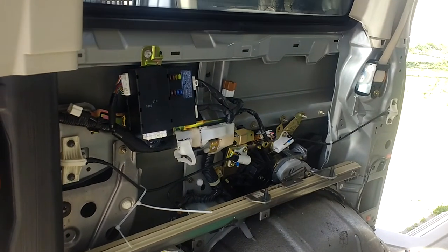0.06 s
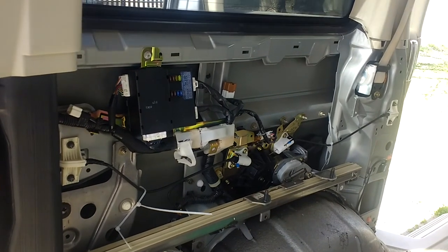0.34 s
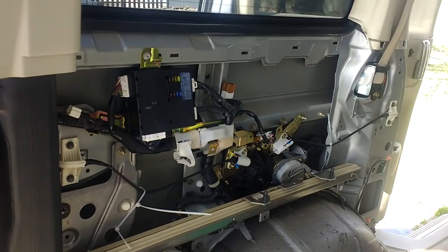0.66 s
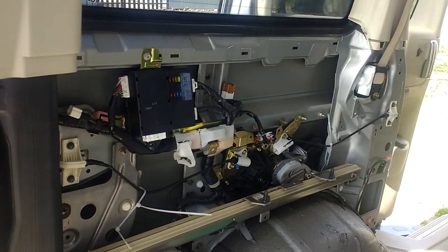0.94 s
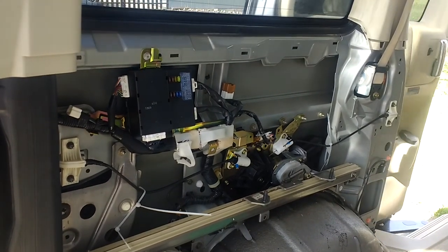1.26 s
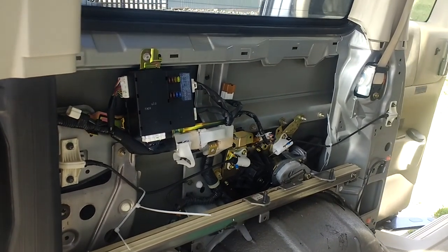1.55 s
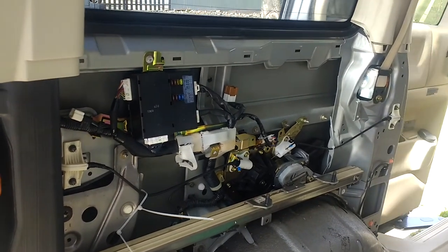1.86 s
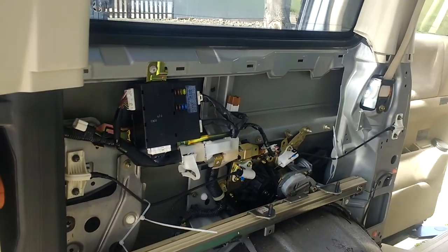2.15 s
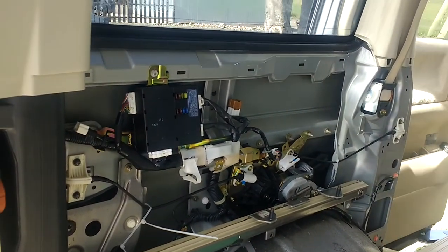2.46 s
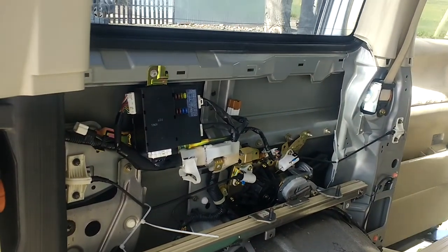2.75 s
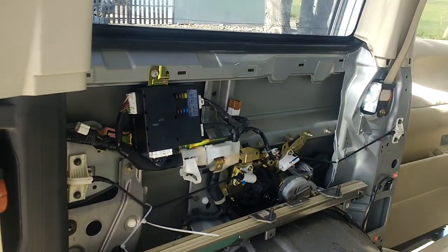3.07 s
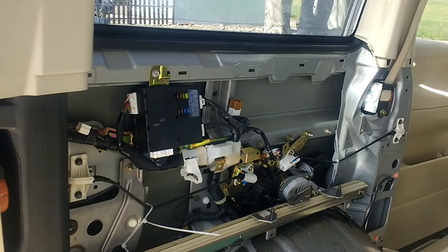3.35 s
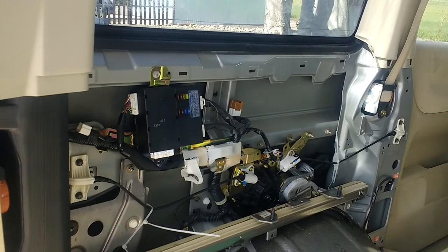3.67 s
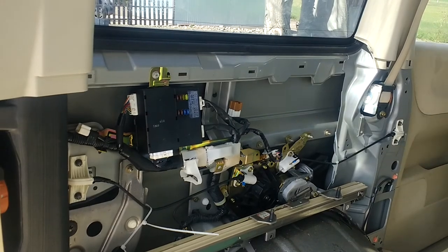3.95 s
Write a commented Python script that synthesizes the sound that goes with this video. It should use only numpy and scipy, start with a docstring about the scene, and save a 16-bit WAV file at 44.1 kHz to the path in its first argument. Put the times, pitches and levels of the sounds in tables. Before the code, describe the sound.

Motorized sliding van door grinding and rolling closed, weakening before it latches with a thunk.

```python
"""Inside a van, microphone close to the bare motor of a powered sliding door.
Rollers rumble through the panels and knock along the track, the cable drive grinds, its gears
groan and the speed controller whistles faintly. The motor slows, picks up again, trips the
catch and pulls the door home with a thunk. Faint outdoor air lies underneath."""
import sys
import numpy as np
from scipy import signal
from scipy.fft import rfft, irfft
from scipy.io import wavfile

SR = 44100
rng = np.random.default_rng(int(sys.argv[2]) if len(sys.argv) > 2 else 0)


def pcm_store(signal):
    """Save signal as 16-bit PCM."""
    levels = np.round(np.clip(np.atleast_2d(signal), -1, 1) * 32767)
    wavfile.write(sys.argv[1], SR, levels.astype(np.int16).T)


N = 176400
T = np.arange(N) / SR
HZ = np.fft.rfftfreq(N, 1 / SR)

# motor speed, as its commutator ripple: time_s, ripple_hz
MOTOR_SPEED = [(0, 520.7), (1.4, 520.2), (1.85, 459.2), (2.0, 408.2), (2.15, 366.4), (2.45, 357.4),
               (2.55, 181.8), (3.2, 179), (3.4, 234.6), (3.62, 365), (3.7, 365)]
# running noise along the travel: time_s, rumble_db, grind_db, brush_hiss_db
TRAVEL_LEVELS = [(0, -29.5, -31.5, -40.5), (.45, -27.5, -33.5, -41), (.9, -26, -33.5, -41.5),
                 (1.35, -26.5, -34.5, -43.5), (1.7, -28.5, -37.5, -44), (1.85, -28.5, -36.5, -44.5),
                 (2.12, -28.5, -38, -46.5), (2.38, -33, -42, -50), (2.47, -34, -43, -49),
                 (2.56, -38, -46, -51), (3.13, -40.5, -43.5, -49.5), (3.3, -37, -41.5, -48.5),
                 (3.5, -38, -39.5, -46.5), (3.65, -32.5, -37.5, -45), (3.74, -30, -28.5, -42),
                 (3.85, -44, -57, -82), (4, -59, -67, -76)]
# clatter of the catch and guide roller: frequency_hz, level_db
HARDWARE_CLATTER = [(100, -9), (500, -7), (1000, 14.5), (1700, -0.5), (3000, -20), (5000, -21),
                    (12000, -62)]
ROLLER_TURN_S, ROLLER_PEAK_S = 0.227, 0.896  # out-of-round roller: one turn, time of one throb
SPEED_JITTER = 0.01667  # share by which the gear mesh and the whistle's ripple waver


def rollers():
    """Track grit shakes the panels; the bass swells slightly once per roller turn."""
    # rolling noise: frequency_hz, level_db
    rumble_spectrum = [(20, -24.5), (40, -34), (65, -17), (95, -5), (135, 0.5), (180, -4.5), (260, -2.5),
                       (400, -7), (520, -14.5), (900, -29.5), (3000, -85)]
    rumble = panels(grit(share=0.55), rumble_spectrum)
    bass = colour(rumble, 1 / (1 + (HZ / 174) ** 8))
    speed = curves(MOTOR_SPEED)[0] / MOTOR_SPEED[0][1]
    throb = amp(0.5 * np.cos(2 * np.pi * (T - ROLLER_PEAK_S) / ROLLER_TURN_S) * speed ** 2)
    return (rumble - bass + bass * unit(throb)) * amp(curves(TRAVEL_LEVELS)[0])


def motor():
    """The drive grinds, shaft orders whir and the brushes hiss, pulsing with the shaft."""
    # cable drive: frequency_hz, level_db
    grind_spectrum = [(100, -27), (300, -5), (500, 0), (650, 1), (850, -2), (1100, -3.5), (1400, -9.5),
                      (2000, -13.5), (3500, -43.5), (9000, -55)]
    # brushes on the commutator: frequency_hz, level_db
    hiss_spectrum = [(300, -30), (1200, 3), (2000, -0.5), (2500, -4), (3300, -1.5), (4300, -5.5),
                     (5300, -13), (6200, -12), (7200, -19.5), (8500, -17.5), (11000, -24.5), (15000, -25)]
    segments, whir_db = 8, -10.5  # commutator segments; whir relative to the grind
    _, grind_db, hiss_db = curves(TRAVEL_LEVELS)
    shaft = wavering_phase(curves(MOTOR_SPEED)[0], jitter=0.01195, rate_hz=14.3) / segments
    orders = sum(np.cos(k * shaft + 2 * np.pi * rng.random()) * (2 if k % segments == 0 else 1)
                 for k in range(2, 41))
    chatter = unit(1 + 0.037 * np.cos(shaft) + 0.078 * wander(hz=24.4))
    grind = panels(grit(share=0.46) * chatter, grind_spectrum)
    grind[0] += amp(whir_db) * panels(orders, grind_spectrum)
    hiss = panels(grit(share=0.13) * chatter, hiss_spectrum)
    return grind * amp(grind_db) + hiss * amp(hiss_db)


def gears():
    """The gear mesh groans with the motor speed while the housing hums at its own pitch."""
    # gearbox: time_s, groan_db, housing_drone_db
    gear_levels = [(0, -31, -36.5), (.4, -32, -42), (1.4, -42, -33.5), (1.8, -37, -67), (2.15, -33.5, -41),
                   (2.42, -40.5, -53), (2.6, -44, -40), (3.2, -53, -44), (3.6, -48, -34), (3.72, -45, -29),
                   (3.82, -75, -63)]
    mesh_ratio, slope_db_per_octave, housing_hz = 0.585, -10, 273.1
    groan_db, drone_db = curves(gear_levels)
    mesh = wavering_phase(mesh_ratio * curves(MOTOR_SPEED)[0], SPEED_JITTER, rate_hz=20.04)
    teeth = sum(amp(slope_db_per_octave * np.log2(k)) * np.sin(k * mesh) for k in range(1, 11))
    groan = unit(teeth * (1 + 0.5 * wander(hz=30.4))) * amp(groan_db)
    hum = np.sin(wavering_phase(housing_hz, jitter=0.035, rate_hz=14))
    drone = unit(hum + 0.35 * band(housing_hz, width_hz=41)) * amp(drone_db)
    return direct_only(groan + drone)


def door_knocks():
    """The door knocks over the track joints and thunks against its stop."""
    # force of each knock in four bands: start_s, boom_db, thud_db, clack_db, crack_db
    knocks = [(0.182, -52, -11.5, -21.5, -48), (.474, -59, -14, -28, -52), (.611, -42, -21.5, -26, -50),
              (0.876, -52, -14, -37, -53), (.9, -40, -16, -27, -61), (1.087, -40, -24, -26, -57),
              (1.279, -43, -15, -36, -50), (1.507, -41, -21, -46, -58), (1.789, -42, -19.5, -25, -59),
              (1.826, -42, -18, -32, -53), (2.108, -50, -38, -22, -44), (2.418, -55, -48, -24, -54),
              (2.454, -46, -21, -51, -60), (2.481, -39, -27, -30, -44), (2.624, -48, -30, -59, -58),
              (3.555, -46, -14.5, -40, -55), (3.687, -58, -19, -31, -50), (3.713, -25, -22, -16.5, -31),
              (3.735, -31, -18, -10, -24), (3.764, -20.5, -32, -33, -53), (3.798, -50, -30, -30.5, -44),
              (3.846, -30, -35, -52, -65)]
    # where those four bands lie: frequency_hz
    bands_hz = [100, 310, 850, 2500]
    # ringing of the door: pitch_hz, level_db, t60_s
    door_modes = [(60.3, -20, 0.33), (134.8, -4.5, 0.35), (278.8, 2, 0.22), (321.7, -4.5, 0.22),
                  (365, -13, 0.17), (473, -11, 0.15), (678, -5, 0.13), (773.6, 1.5, 0.11),
                  (943, -25.5, 0.54), (982, -4.5, 0.1), (1267, -12, 0.15), (1687, -4, 0.079),
                  (2220, 0, 0.077), (2650, -12, 0.077), (3080, -20, 0.07)]
    # clatter of the door: frequency_hz, level_db
    door_clatter = [(25, -42), (42, -10), (58, 15), (110, 8), (200, -8), (300, 0.5), (420, -16),
                    (560, -1.5), (850, -3.5), (1700, -5), (2500, -1.5), (4200, -18), (6000, -27),
                    (9000, -39), (15000, -52)]
    out = np.zeros((2, N))
    for start_s, *force_db in knocks:
        add(out, start_s, blow(door_modes, door_clatter, list(zip(bands_hz, force_db)), clatter_db=-3))
    return out


def latch():
    """The catch trips, then the latch slams onto its striker."""
    # ringing of the catch: pitch_hz, level_db, t60_s
    catch_modes = [(660, 7.5, 0.07), (1019, 0, 0.1), (1163, 0, 0.05), (1550, -9, 0.043), (1700, -6, 0.045),
                   (2180, -12, 0.074), (2773, -7.5, 0.024)]
    # ringing of the latch on the striker: pitch_hz, level_db, t60_s
    strike_modes = [(278.3, 1, 0.14), (406, 9, 0.033), (840, -8, 0.045), (1020, -1.5, 0.042),
                    (1227, -3.5, 0.057), (1465, -13, 0.073), (1930, -7, 0.035), (2287, -10, 0.081),
                    (2420, 0, 0.052), (2590, -6, 0.043), (3050, -8, 0.059), (3240, -11.5, 0.052),
                    (4100, -18, 0.078), (4500, -18.5, 0.074)]
    # rattle of that strike: frequency_hz, level_db
    strike_clatter = [(40, -9), (120, 0.5), (400, 2), (700, -2), (1300, 1), (2000, 4), (2500, 0.5),
                      (4300, -23), (6000, -23), (15000, -50)]
    catch_s, strike_s = 3.6565, 3.7175
    out = np.zeros((2, N))
    add(out, catch_s, blow(catch_modes, HARDWARE_CLATTER, flat(db=-12), clatter_db=-6.5))
    add(out, strike_s, blow(strike_modes, strike_clatter, flat(db=-7.5), clatter_db=-9.5))
    return out


def clicks_and_ticks():
    """The guide roller clicks dryly; latch and guide give thin ticks with no ring."""
    # guide roller clicks: start_s, force_db
    clicks = [(1.967, -14), (2.473, -11), (2.477, -28)]
    # ringing of the guide roller: pitch_hz, level_db, t60_s
    click_modes = [(653, -4.5, 0.034), (831, 1, 0.034), (1090, -14, 0.022), (1575, -17.5, 0.065),
                   (2050, -16, .06), (3040, -22, 0.045), (4220, -22, 0.046)]
    # latch and guide ticks: start_s, level_db
    ticks = [(2.477, -47), (3.657, -48), (3.707, -35), (3.719, -31.5), (3.744, -37), (3.753, -51),
             (3.797, -52)]
    # one tick: frequency_hz, level_db
    tick_spectrum = [(1000, -11), (3000, 16), (4400, 9.5), (6200, 3.5), (8500, -5.5), (12000, -6),
                     (15000, -11)]
    out = np.zeros((2, N))
    for start_s, force_db in clicks:
        add(out, start_s, blow(click_modes, HARDWARE_CLATTER, flat(force_db), clatter_db=-22))
    for start_s, level_db in ticks:
        add(out, start_s, blow([], tick_spectrum, flat(db=0), clatter_db=level_db))
    return out


def track():
    """The roller thumps at each turn, most in mid travel, and the guide scrapes briefly."""
    # guide rubbing on the track: middle_s, length_s, pitch_hz, width_hz, level_db
    scrapes = [(0.586, 0.026, 2170, 500, -42), (0.873, 0.15, 6000, 900, -55.5),
               (1.133, 0.043, 2950, 300, -49), (2.643, 0.038, 4200, 400, -57),
               (2.695, 0.06, 2940, 300, -49), (3.533, 0.04, 3956, 900, -49)]
    turn = np.cos(np.pi * (T - ROLLER_PEAK_S) / ROLLER_TURN_S) ** 4
    thump = band(hz=96, width_hz=22) * turn * amp(-31) * swell(middle_s=1.19, length_s=1.6)
    scraping = sum(band(hz, width_hz) * amp(db) * swell(middle_s, length_s)
                   for middle_s, length_s, hz, width_hz, db in scrapes)
    return direct_only(thump + scraping)


def track_load():
    """Gain of the rollers and gears as the door presses on the uneven track and eases off."""
    # surges and lulls: middle_s, length_s, gain_db
    surges = [(0.433, 0.059, -1.5), (0.803, 0.028, -2), (0.876, .08, 0), (1.043, 0.082, -1.5),
              (1.258, 0.039, -5), (1.324, .09, 1.5), (1.833, 0.036, 3), (1.907, 0.043, -1),
              (2.076, 0.07, -1)]
    return amp(sum(db * swell(middle_s, length_s) for middle_s, length_s, db in surges))


def controller():
    """The switching tone sings in the windings, with sidebands at the commutator rate."""
    # controller whistle: time_s, level_db
    whistle_levels = [(0, -73), (.8, -69), (.96, -65), (1.78, -66), (1.89, -58.5), (2.41, -57.5),
                      (2.5, -66), (3.05, -64), (3.54, -70), (3.65, -66), (3.7, -100)]
    switching_hz, sideband_db = 9768, -17.5
    ripple = np.cos(wavering_phase(curves(MOTOR_SPEED)[0], SPEED_JITTER, rate_hz=12))
    level = amp(curves(whistle_levels)[0] + 1.3 * wander(hz=28))
    tone = np.sqrt(2) * np.sin(2 * np.pi * switching_hz * T)
    return tone * level * (1 + 2 * amp(sideband_db) * ripple)


def latch_whir():
    """A faint whir starts in the latch once the door is home."""
    # bands of the whir: pitch_hz, width_hz, level_db
    whir_bands = [(945, 75, -55), (4300, 500, -69)]
    start_s, rise_s = 3.85, 0.043
    whir = sum(amp(db) * band(hz, width_hz) for hz, width_hz, db in whir_bands)
    return direct_only(whir * np.clip((T - start_s) / rise_s, 0, 1))


def outdoor_air():
    """Steady outdoor air, heard through the panels."""
    # background air: frequency_hz, level_db
    air_spectrum = [(20, -16), (80, -8), (160, 3), (300, 2), (550, 2), (920, -12), (1300, -3.5),
                    (4000, -20.5), (15000, -37.5)]
    return amp(-50) * panels(rng.standard_normal((2, N)), air_spectrum)


def cabin(dry):
    """Adds the short, quiet reverberation of the van's cabin."""
    t60_s, gap_s, tail_db = 0.38, 0.006, -18
    tail = rng.standard_normal((2, N)) * amp(-60 * T / t60_s) * (T > gap_s)
    tail /= np.linalg.norm(tail[0])
    return dry + amp(tail_db) * signal.fftconvolve(dry, tail, axes=1)[:, :N]


def microphone(streams):
    """Two opposed ports: the direct stream reaches both, the diffuse one makes them differ."""
    # likeness of the ports: frequency_hz, coherence
    likeness = [(50, 0.97), (150, 0.97), (400, 1), (520, 0.31), (800, 1), (1500, 0.58), (2500, 0.94),
                (7000, 1), (15000, 1)]
    # phase between the ports, on top of their delay: frequency_hz, phase_rad
    phase_bend = [(40, -0.35), (100, -0.79), (200, -1.4), (400, -0.89), (480, -1.1), (530, -1.23),
                  (650, -1.5), (800, -0.34), (1000, 0.066), (2000, -0.12)]
    # stereo balance: frequency_hz, left_minus_right_db
    balance = [(40, -4), (120, 4), (180, 1.5), (320, 2), (440, 5.5), (560, 5), (690, -3), (850, 1.9),
               (1500, -2.5), (2000, 0), (15000, 0)]
    delay_s = 0.000557
    direct, diffuse = rfft(streams)
    coherence = np.clip(read(likeness, HZ), 0, 1)
    direct *= np.sqrt((1 + coherence) / 2)
    diffuse *= np.sqrt((1 - coherence) / 2)
    shift = np.exp(1j * (np.pi - 2 * np.pi * HZ * delay_s + read(phase_bend, HZ)))
    lean = amp(read(balance, HZ) / 2)
    return irfft([(direct + diffuse) * lean * shift, (direct - diffuse) / lean], N)


def blow(modes, spectrum, force, clatter_db, size=24000):
    """One impact: ringing modes plus dense clatter, both weighted by the spectrum of the force."""
    # decay of the clatter: frequency_hz, t60_s
    clatter_decay = [(60, 0.46), (300, .16), (1000, 0.11), (2500, 0.1), (10000, 0.088)]
    ring_db, onset_s = -6, 0.0018
    t, hz = np.arange(size) / SR, np.fft.rfftfreq(size, 1 / SR)
    quadrature = np.array([[0], [np.pi / 2]])
    ring = sum(amp(db + read(force, f) - 60 * t / t60) * np.sin(2 * np.pi * f * t + quadrature)
               for f, db, t60 in modes)
    phases = np.exp(2j * np.pi * rng.random((2, len(hz))))
    noise = unit(irfft(phases * amp(read(spectrum, hz))))
    struck = irfft(rfft(noise) * amp(read(force, hz)))
    bin_hz, frame_s, frames = signal.stft(struck, SR, nperseg=512)
    decay = amp(-60 * frame_s / read(clatter_decay, bin_hz)[:, None])
    clatter = signal.istft(frames * decay, SR, nperseg=512)[1][:, :size]
    return (amp(ring_db) * ring + amp(clatter_db) * clatter) * (1 - np.exp(-t / onset_s))


def panels(excitation, spectrum):
    """Rings an excitation through the main panel resonances and a ripple of lesser ones, rms 1."""
    # panel and housing resonances: pitch_hz, width_hz, lift_db
    resonances = [(101, 11, 4), (142.8, 13, 6), (218, 5.9, 2), (265.5, 60, 4.5), (365, 5.9, 4),
                  (395, 25, 2.5), (693, 40, 2.5), (804, 39, 5), (914, 75, 5.5), (1033, 32, 5.5),
                  (1502, 22, 6.5), (2153, 71, 4), (2830, 230, 3.5)]
    db = read(spectrum, HZ) + sum(lift * resonance(hz, width) for hz, width, lift in resonances)
    lesser_hz = np.arange(0, SR / 2, 30)
    ripple_db = 2 * np.interp(HZ, lesser_hz, rng.standard_normal(len(lesser_hz)))
    db += ripple_db * np.minimum(HZ / 1200, 1)
    log_gain = np.log(amp(np.r_[db, db[-2:0:-1]]))
    minimum_phase = np.exp(np.conj(signal.hilbert(log_gain)))[:len(HZ)]  # rings only after a hit
    return unit(colour(excitation, minimum_phase))


def grit(share):
    """Two streams of tiny uneven impacts, holding this share of the power, over smooth friction."""
    grains_per_s, spread_db = 450, 2
    hits = (rng.random((2, N)) < grains_per_s / SR) * rng.choice([-1, 1], (2, N))
    hits = hits * amp(spread_db * np.minimum(rng.exponential(1, (2, N)), 4))
    return np.sqrt(share) * unit(hits) + np.sqrt(1 - share) * rng.standard_normal((2, N))


def band(hz, width_hz):
    """A resonance kept ringing by friction, rms 1."""
    return unit(colour(rng.standard_normal(N), resonance(hz, width_hz)))


def resonance(hz, width_hz):
    """A peak of height 1 along the frequency axis."""
    return 1 / (1 + (2 * (HZ - hz) / width_hz) ** 2)


def wavering_phase(hz, jitter, rate_hz):
    """Running phase of a pitch that strays by the share `jitter`."""
    return 2 * np.pi * np.cumsum(hz * (1 + jitter * wander(rate_hz))) / SR


def wander(hz):
    """Slow random drift, rms 1."""
    return unit(colour(rng.standard_normal(N), np.exp(-(HZ / hz) ** 2)))


def swell(middle_s, length_s):
    """A bell-shaped rise and fall."""
    return np.exp(-(2 * (T - middle_s) / length_s) ** 2)


def direct_only(x):
    """Pairs a direct stream with a silent diffuse one."""
    return np.array([x, np.zeros(N)])


def flat(db):
    """A spectrum with one level throughout."""
    return [(1, db)]


def amp(db):
    """Decibels to gain."""
    return 10 ** (np.asarray(db) / 20)


def unit(x):
    """Scales to rms 1."""
    return x / np.sqrt(np.mean(x ** 2) + 1e-20)


def read(points, hz):
    """Reads a spectrum on a log-frequency axis."""
    f, value = np.transpose(points)
    return np.interp(np.log(hz + 1), np.log(f + 1), value)


def curves(table):
    """Each column of a timed table at every sample."""
    time_s, *columns = np.transpose(table)
    return [np.interp(T, time_s, column) for column in columns]


def colour(x, gain):
    """Filters by a gain for every frequency."""
    return irfft(rfft(x) * gain, N)


def add(mix, start_s, sound):
    """Mixes a sound in at a time."""
    part = mix[:, round(start_s * SR):][:, :sound.shape[1]]
    part += sound[:, :part.shape[1]]


def scene():
    """Door, drive and outdoor air at the microphone."""
    air = outdoor_air()
    running = (rollers() + gears()) * track_load() + track() + motor()
    impacts = cabin(door_knocks() + latch() + clicks_and_ticks())
    return microphone(running + impacts + latch_whir() + air) + controller()


def record(dry):
    """The recorder's band limit, with a very short fade at the end."""
    edge_hz, fade_s = 15500, 0.015
    faded = dry * np.minimum((T[-1] - T) / fade_s, 1)
    lowpass = signal.firwin(511, edge_hz, window=("kaiser", 9), fs=SR)
    return signal.oaconvolve(faded, lowpass[None], "same")


dry = scene()
out = record(dry)
pcm_store(out)
```